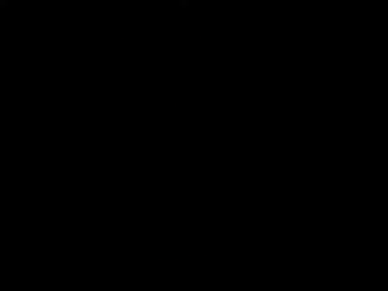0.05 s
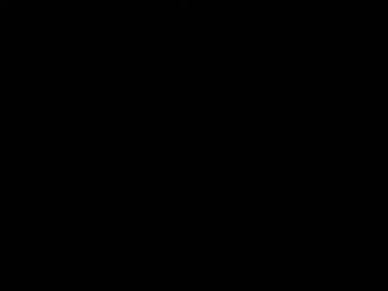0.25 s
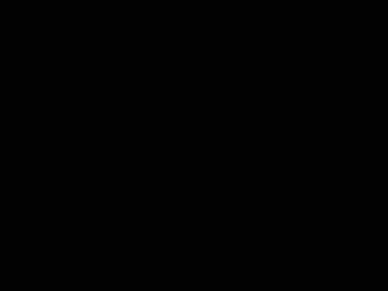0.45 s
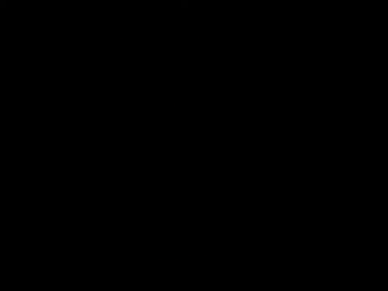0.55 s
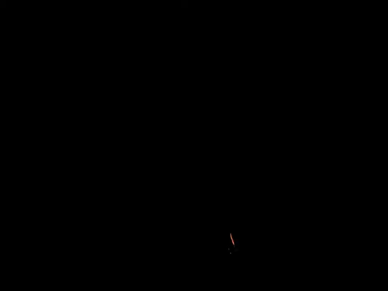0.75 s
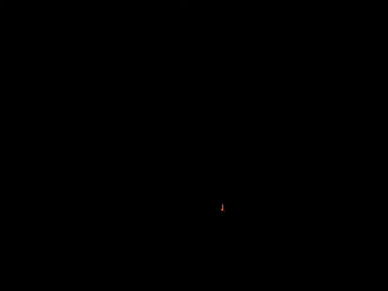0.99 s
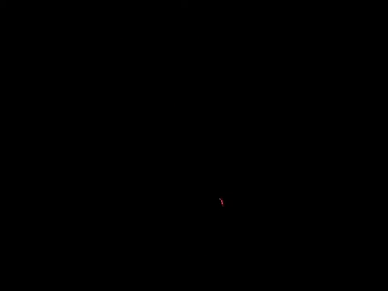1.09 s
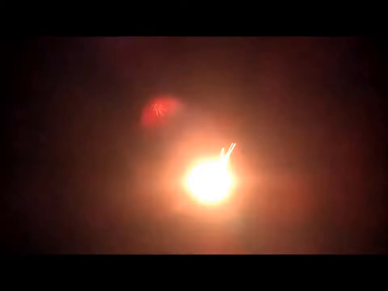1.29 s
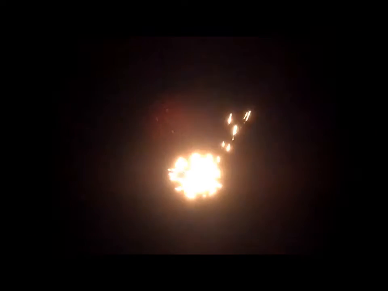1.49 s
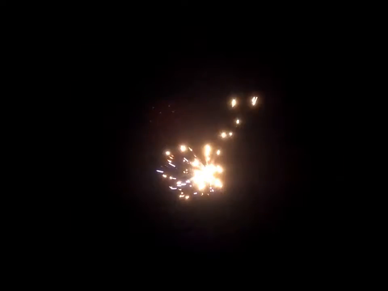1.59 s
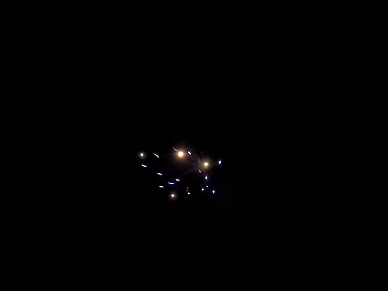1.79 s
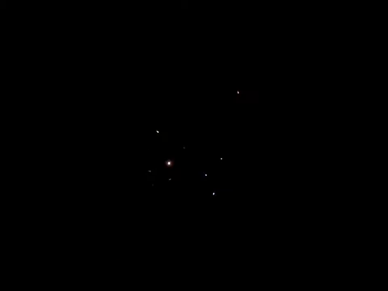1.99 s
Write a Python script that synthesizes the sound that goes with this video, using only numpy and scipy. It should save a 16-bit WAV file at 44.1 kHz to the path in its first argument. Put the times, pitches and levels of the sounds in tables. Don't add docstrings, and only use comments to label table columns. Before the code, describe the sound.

A firework outdoors at night. A fuse hiss swells quickly from the start into a very sharp, clipped launch crack at 0.24 seconds, followed by tiny pops, one clearer at 0.37, and a noisy fading echo. Faint air, low hum and weak hiss fill the gap. At 1.35 a second dry crack bursts with clustered snaps, a small pop near 1.44, and a dull rolling tail until 2 seconds. Wide pocket-recorder stereo.

```python
import sys
import numpy as np
from scipy import signal
from scipy.fft import rfft, irfft
from scipy.io import wavfile
from scipy.ndimage import uniform_filter1d

SR = 44100
rng = np.random.default_rng(int(sys.argv[2]) if len(sys.argv) > 2 else 0)


def volts(x):
    e = np.asarray(x, float) / 20
    return 10 ** e


def persist_wave(psi):
    counts = np.round(np.clip(psi, -1, 1) * 32767).astype(np.int16)
    wavfile.write(sys.argv[1], SR, np.atleast_2d(counts).T)


N = 90404

# (time [s], level [dB], pitch [Hz], fade [cycles], left port lag [us])
BLASTS = [
    (.2435, -13, 1100, .5, 20),
    (.24497, 7, 1130, .4, 80),
    (1.34912, 7, 1150, .72, -40),
]
# (time [s], level [dB], pitch [Hz], width [cycles], left port lag [us])
RETURNS = [(0.0213, -45.5, 1120, 1.6, -24), (.2491, -13, 239, 0.85, 59.5), (.262, -30, 257, 1.5, 0),
           (.2615, -37, 1510, .8, 50), (0.2828, -40, 1400, .9, -1.5), (.3285, -40.5, 1250, 1.3, -64),
           (.332, -42.5, 543, 1.07, -9), (0.3371, -41.5, 417, 0.71, 24), (0.3722, -21, 1750, 1.1, 76),
           (.377, -37.5, 206, 0.82, 4), (.389, -45, 1530, 0.67, 19), (1.351, -17, 1100, .5, 30),
           (1.3519, -17, 1000, .5, 0), (1.3529, -14, 1100, .5, 0), (1.3558, -9, 650, .36, 20),
           (1.3577, -15, 290, .55, -60), (1.4076, -38.5, 900, 2.3, 6), (1.4358, -27.5, 1400, 0.84, -4),
           (1.637, -44, 890, 2, 0)]
# (time [s], level [dB], pitch [Hz], width [cycles])
SWEEPS = [
    (.2465, -32.5, 220, 0.63),
    (1.3498, -13.5, 510, 0.36),
    (1.3552, -22.5, 480, 0.52),
]
# (peak time [s], level [dB], rise [s/60 dB], fall [s/60 dB], tilt [dB/octave])
TAILS = [
    (.26, -38.5, 8, 0.1546, 0.3),
    (.335, -54, 1.1, 1.04, 0.53),
    (1.352, -33.5, -0.9, 0.03, 3),
    (1.37, -37, .05, 0.08, 1.66),
    (1.42, -37, 1.46, 0.6427, 0.12),
    (1.558, -47.5, 0.95, 2, -2.24),
]
# (frequency [Hz], level [dB])
ECHO_COLOUR = [(60, -23.5), (200, -13), (500, -3), (1300, -2), (2600, -8.5), (5000, -16.5), (9000, -24),
               (16000, -28)]
# (time [s], level [dB])
FUSE_LEVEL = [(0, -62.5), (.1, -55.5), (.2, -43.5), (.235, -45), (.27, -59), (.4, -70), (.55, -85),
              (.84, -88), (1.05, -73.5), (1.28, -70.5), (1.35, -73.5), (1.45, -93), (2.05, -101.5)]
# (frequency [Hz], level [dB])
HISS_COLOUR = [(80, -17), (400, -8.5), (1500, 0), (3000, -8), (4500, -2), (8000, -15.5), (12000, -4),
               (15000, -4)]
# (frequency [Hz], level [dB])
NIGHT_COLOUR = [(50, -6.5), (120, 10.5), (400, 0.5), (1500, -1), (2500, -5), (5000, -12.5), (9000, -16.5),
                (16000, -21)]
# (time [s], level [dB])
NIGHT_LEVEL = [(0, -52), (.2, -53), (.45, -63), (.6, -66.5), (.85, -69.5), (1.3, -67), (1.4, -62),
               (2.05, -72.5)]

FRONT_WARP, CRACK_DB, CRACK_DECAY_S = 0.75, -22, 0.0005
GRIT_DB = -7
RUSH_S, RUSH_DB, RUSH_TILT_DB_PER_OCT = 0.2445, -27.5, -4
RUSH_RISE_S, RUSH_FALL_S = 0.045, 0.01
HUM_HZ, HUM_DB = 239.9, -6
PORT_SPACING_M, PORT_NOISE, SOUND_SPEED_M_S = 0.15, 0.1, 343
CAVITY_HZ, CAVITY_WIDTH_HZ, CAVITY_DB = 14900, 2000, 4
CROSS_LAG_SAMPLES, CROSS_GAIN = 16, 0.99
GAP_SHARE = 0.5
CEILING, KNEE = 0.95, 5
TOP_HZ, BOTTOM_HZ = 15850, 50


def around(time_s, lag_us, span):
    index = int(time_s * SR) + span
    port_delay_s = np.array([[0.5], [-0.5]]) * lag_us / 1e6
    return index, index / SR - time_s - port_delay_s


def swell(peak_s, db, rise_s, fall_s):
    t = np.arange(N) / SR
    return db - 60 * np.where(t < peak_s, (peak_s - t) / rise_s, (t - peak_s) / fall_s)


def level_curve(table):
    time_s, db = np.transpose(table)
    return np.interp(np.arange(N) / SR, time_s, db)


def walk(rate_hz):
    hold = int(SR / rate_hz)
    steps = np.repeat(rng.standard_normal(N // hold + 1), hold)
    return 1.28 * uniform_filter1d(uniform_filter1d(steps, hold), hold)[:N]


def diffuse(colour, tilt_db_per_oct=0.0, apart=PORT_NOISE):
    hz = np.maximum(np.arange(N // 2 + 1) * SR / N, 20)
    colour_hz, colour_db = np.transpose(colour)
    db = np.interp(np.log(hz), np.log(colour_hz), colour_db)
    gain = volts(db + tilt_db_per_oct * np.log2(hz / 1000))
    alike = np.sinc(2 * hz * PORT_SPACING_M / SOUND_SPEED_M_S) * (1 - np.clip(apart, 0, 1))
    turn = np.pi * hz * CROSS_LAG_SAMPLES / SR
    gap_width = GAP_SHARE * np.minimum(hz / 5500, 1)

    def component(sign, cross_response):
        kept = np.clip(np.abs(cross_response) / gap_width, 0, 1) ** 4
        kept = np.where(hz < 1000, 1, kept)
        spectrum = rfft(rng.standard_normal(N)) * gain * kept
        return irfft(spectrum * np.sqrt(1 + sign * alike), N)

    mid = component(1, np.sin(turn))
    side = component(-1, np.cos(turn))
    ports = np.array([mid + side, mid - side])
    return ports / ports.std()


def reports():
    out, span = np.zeros((2, N)), np.arange(-32, 1024)
    for time_s, db, hz, cycles, lag_us in BLASTS:
        index, t = around(time_s, lag_us, span)
        t = np.maximum(t, 0)
        swing = -np.sin(2 * np.pi * (hz * t) ** FRONT_WARP) * np.exp(-(hz * t / cycles) ** 2)
        noise = rng.standard_normal((2, len(span)))
        crack = volts(CRACK_DB) * (t > 0) * np.exp(-t / CRACK_DECAY_S) * noise
        out[:, index] += volts(db) * (swing + crack)
    return out


def returns():
    out, span = np.zeros((2, N)), np.arange(-700, 700)
    for time_s, db, hz, cycles, lag_us in RETURNS:
        index, t = around(time_s, lag_us, span)
        grit = uniform_filter1d(rng.standard_normal((2, len(span))), size=4)
        swing = np.sin(2 * np.pi * hz * t) + volts(GRIT_DB) * (hz / 1800) ** 2 * grit
        out[:, index] += volts(db) * np.exp(-(hz * t / cycles) ** 2) * swing
    for time_s, db, hz, cycles in SWEEPS:
        index, t = around(time_s, 0, span)
        wave = np.exp(-(hz * t / cycles) ** 2) * np.sin(2 * np.pi * hz * t)
        out[:, index] += volts(db) * wave * np.array([[-1], [1]])
    return out


def echoes():
    out = np.zeros((2, N))
    for peak_s, db, rise_s, fall_s, tilt_db_per_oct in TAILS:
        blast_s = max(blast[0] for blast in BLASTS if blast[0] < peak_s)
        started = np.arange(N) / SR > blast_s
        level_db = swell(peak_s, db, rise_s, fall_s) + 0.6 * walk(35) + 1.6 * walk(260)
        out += started * volts(level_db) * diffuse(ECHO_COLOUR, tilt_db_per_oct)
    return out


def fuse():
    rush_db = swell(RUSH_S, RUSH_DB, RUSH_RISE_S, RUSH_FALL_S) + 2.1 * walk(500)
    rush = volts(rush_db) * diffuse(HISS_COLOUR, RUSH_TILT_DB_PER_OCT)
    hiss = volts(level_curve(FUSE_LEVEL) + 1.6 * walk(69)) * diffuse(HISS_COLOUR)
    return rush + hiss


def night():
    t = np.arange(N) / SR
    hum = volts(HUM_DB + 0.8 * walk(5)) * np.sin(2 * np.pi * HUM_HZ * t)
    air = volts(0.7 * walk(6)) * diffuse(NIGHT_COLOUR, apart=0.25)
    return volts(level_curve(NIGHT_LEVEL)) * (air + hum)


def scene():
    return reports() + returns() + echoes() + fuse() + night()


def band_limit(x):
    return signal.sosfilt(signal.butter(12, 16710, fs=SR, output="sos"), x)


def record(dry):
    b, a = signal.iirpeak(CAVITY_HZ, CAVITY_HZ / CAVITY_WIDTH_HZ, fs=SR)
    x = dry + volts(CAVITY_DB) * signal.lfilter(b, a, dry)
    top_cut = signal.ellip(8, 0.2, 70, TOP_HZ, fs=SR, output="sos")
    x = signal.sosfilt(top_cut, x)
    x = x - CROSS_GAIN * np.roll(x[::-1], CROSS_LAG_SAMPLES, axis=1)
    x = x / (1 + np.abs(x / CEILING) ** KNEE) ** (1 / KNEE)
    bass_cut = signal.butter(2, BOTTOM_HZ, "high", fs=SR, output="sos")
    x = signal.sosfilt(bass_cut, x)
    return band_limit(x)


dry = scene()
out = record(dry)
persist_wave(out)
```